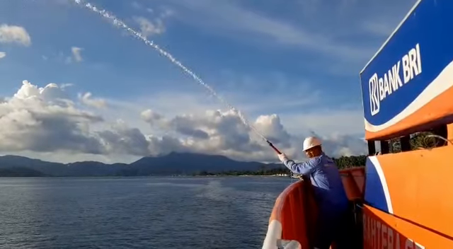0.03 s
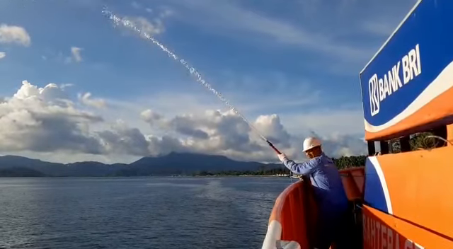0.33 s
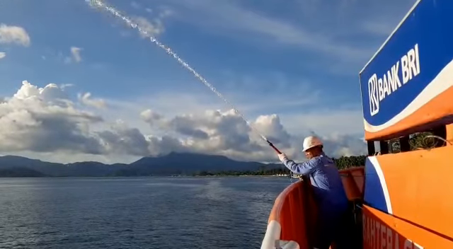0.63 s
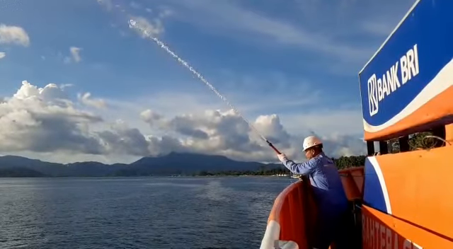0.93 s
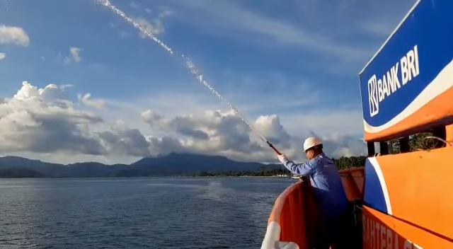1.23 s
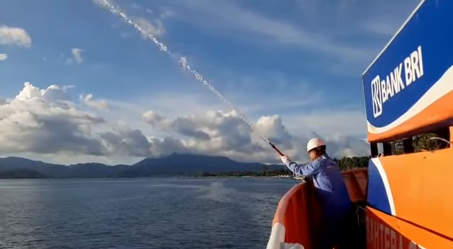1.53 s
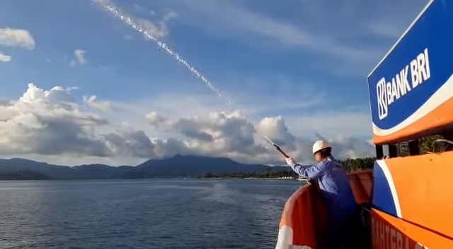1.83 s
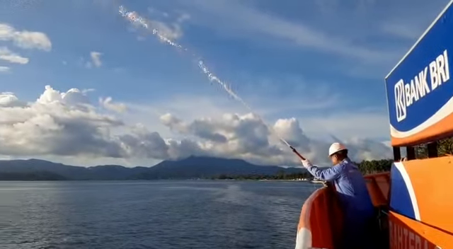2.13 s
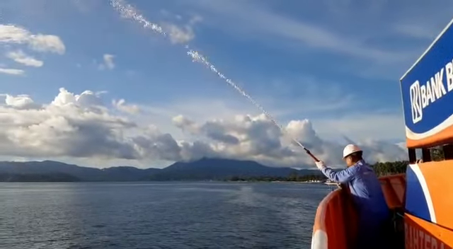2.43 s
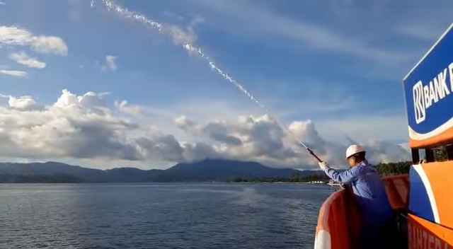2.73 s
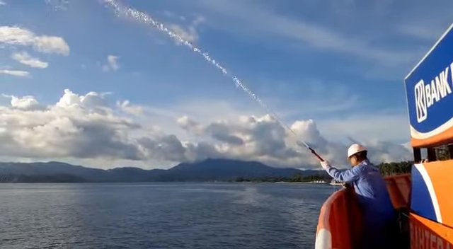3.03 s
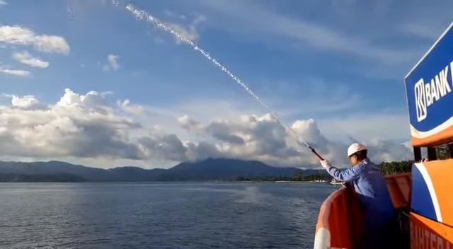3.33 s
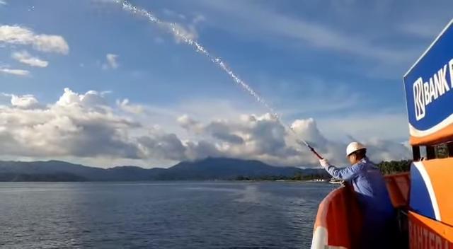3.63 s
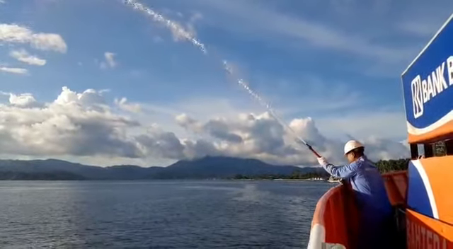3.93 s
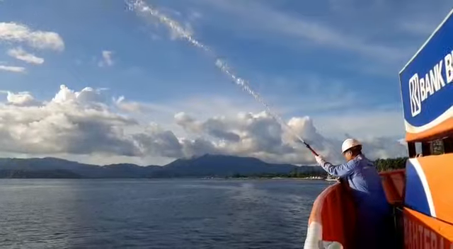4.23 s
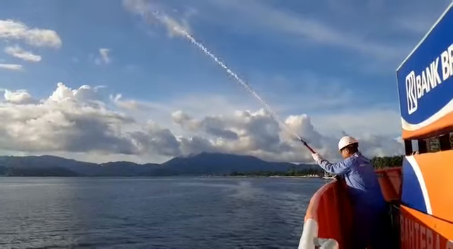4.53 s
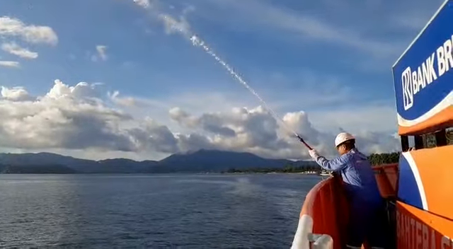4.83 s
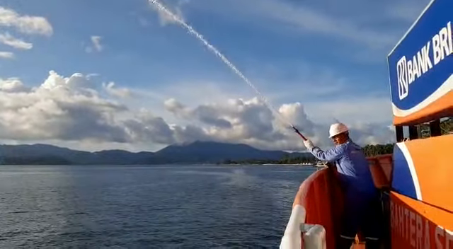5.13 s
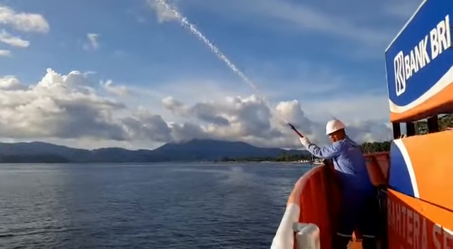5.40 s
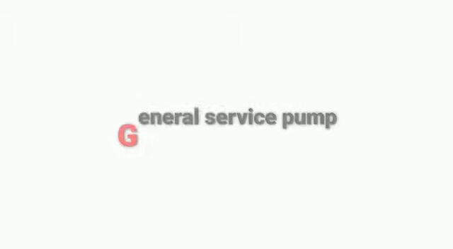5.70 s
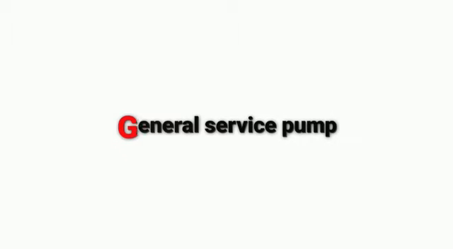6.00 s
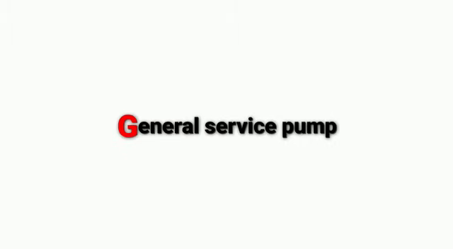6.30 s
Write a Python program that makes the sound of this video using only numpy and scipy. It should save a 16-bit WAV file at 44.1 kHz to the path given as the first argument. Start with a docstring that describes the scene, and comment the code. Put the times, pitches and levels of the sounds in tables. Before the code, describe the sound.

From the start, a ship's diesel engine throbs loudly and evenly, with a low machinery rumble and a faint pump whine. Over it, a fire hose gives a thin, steady hiss. The nozzle cracks and spits sharply at uneven intervals, about three times a second, each crack followed by a very short echo from nearby steel walls. The cracks bunch together between about 4.1 and 4.7 seconds, pause, then return at 5.4 and 5.6 seconds. Faint drops tick on the rail throughout. A breeze buffets the microphone with low gusts, strongest near 0.5, 2.5, 3.1 and 4.3 seconds. Dull hull thumps come softly at 0.5 seconds, then near 2.4 and 3.1, and more strongly at 3.6 and 5.7 seconds. Everything cuts off abruptly at about 5.8 seconds, leaving silence.

```python
"""Fire hose on a ship's deck

A diesel throbs and drives the fire pump while a hose throws a thin, hissing jet over a calm sea.
The nozzle spits and cracks sharply, probably as trapped air bursts out; close steel walls reflect
each crack, and stray drops tick on the rail. A breeze buffets the microphone, and something thumps
dully on the hull now and then. The sound stops abruptly."""
import sys
import numpy as np
from scipy import signal
from scipy.fft import rfft, irfft, next_fast_len
from scipy.io import wavfile
from scipy.ndimage import uniform_filter1d, map_coordinates

SR = 44100
rng = np.random.default_rng(int(sys.argv[2]) if len(sys.argv) > 2 else 0)


def pcm_store(signal):
    """Save signal as 16-bit PCM."""
    levels = np.round(np.clip(np.atleast_2d(signal), -1, 1) * 32767)
    wavfile.write(sys.argv[1], SR, levels.astype(np.int16).T)


N = 280476

# likeness of left and right in the noise on deck: (frequency [Hz], correlation [-1..1])
DECK_CORRELATION = [(60, 1), (130, 0.98), (290, 0.75), (640, 0.27), (1410, -0.46), (3100, -0.17),
                    (6820, -0.0052), (15000, -0.086)]


def amp(db):
    """Amplitude ratio of a level in decibels."""
    return 10 ** (np.asarray(db) / 20)


def unit(x):
    """Normalisation to an rms of 1."""
    return x / np.sqrt(np.mean(x ** 2) + 1e-20)


def along(points, hz):
    """Interpolation of (frequency [Hz], value) points on a logarithmic frequency axis."""
    freqs, values = np.transpose(points)
    return np.interp(np.log(hz + 1), np.log(freqs + 1), values)


def curve(points):
    """Linear interpolation of (time [s], value) points at every sample."""
    return np.interp(np.arange(N) / SR, *np.transpose(points))


def wobble(rate):
    """Slow random modulation: a spline through `rate` Gaussian knots a second."""
    knots = rng.standard_normal(int(N * rate / SR) + 4)
    return map_coordinates(knots, [np.arange(N) * rate / SR])


def pan(db):
    """Channel gains for an interaural level difference, left minus right."""
    return amp(np.array([[.5], [-.5]]) * db)


def filtered(x, response):
    """Linear filtering: the spectrum is multiplied by response(hz)."""
    size = next_fast_len(N + SR // 2)
    return irfft(rfft(x, size) * response(np.fft.rfftfreq(size, 1 / SR)), size)[..., :N]


def minimum_phase(gain):
    """Folding the cepstrum gives the quickest causal response with this gain."""
    cepstrum = irfft(np.log(np.maximum(gain, 1e-6)))
    half = cepstrum.shape[-1] // 2
    return np.exp(rfft(cepstrum * np.r_[1, np.full(half - 1, 2), 1, np.zeros(half - 1)]))


def add(track, s, sound):
    """Superposition of a sound on the track from s seconds on."""
    start = round(s * SR)
    track[:, start:start + sound.shape[-1]] += sound[:, :N - start]


def rush(spectrum, correlation, patchy_db):
    """Partly coherent stereo noise of rms 1, its gain patchy in time and frequency."""
    cells = signal.stft(rng.standard_normal((2, N)), nperseg=512)[2]
    patches = uniform_filter1d(rng.standard_normal(cells.shape[1:]), size=5, axis=0)
    patches = uniform_filter1d(patches, size=14, axis=1)
    pair = signal.istft(cells * amp(patchy_db * unit(patches)), nperseg=512)[1][:, :N]

    def mid_side_gains(hz):
        angle = np.arccos(np.clip(along(correlation, hz), -1, 1)) / 2
        return amp(along(spectrum, hz)) * [np.cos(angle), np.sin(angle)]

    mid, side = filtered(pair, mid_side_gains)
    return unit(np.array([mid + side, mid - side]))


def scatter(t, t60, smooth_hz=500):
    """Diffuse reflection: exponentially decaying stereo noise, whitened to unit energy."""
    envelope = amp(-60 * t / t60) * (1 - np.exp(-t / 0.00066))
    spectrum = rfft(rng.standard_normal((2, len(t))) * envelope)
    power = uniform_filter1d(np.abs(spectrum) ** 2, size=int(smooth_hz * len(t) / SR), axis=1)
    return irfft(spectrum / np.sqrt(np.abs(power) + 1e-20))


def engine_room(level_db=-34):
    """Structure-borne sound: a steady machinery rumble comes up through the deck."""
    # rumble spectrum: (frequency [Hz], relative density [dB])
    spectrum = [(20, -23.5), (40, -10), (70, 2), (97, -6), (130, 1.5), (230, -3), (330, -5), (450, -14),
                (600, -22), (1200, -38)]
    return amp(level_db) * rush(spectrum, DECK_CORRELATION, patchy_db=0.5) * pan(-1.8)


def wind(eddy_db=1.62, eddies_per_s=9, flap_steepness=2.32):
    """Turbulent pressure: eddies hit each microphone port separately; strong gusts add brighter flaps."""
    # strength of the breeze: (time [s], relative level [dB])
    breeze = [(0, -31.5), (.17, -31.5), (.35, -39), (.52, -25), (.78, -33), (.92, -29.5), (1.48, -30),
              (1.95, -36.5), (2.1, -32), (2.48, -23.5), (2.75, -30), (3.12, -24.5), (3.6, -40.5),
              (3.9, -31.5), (4.28, -26.5), (4.6, -40.5), (5.7, -41.5)]
    # buffeting spectrum: (frequency [Hz], relative density [dB])
    buffet_spectrum = [(20, -27), (30, -25.5), (50, 3.5), (95, 3.5), (140, 4), (200, -1), (300, -13.5),
                       (450, -30.5), (700, -32), (1500, -55.5)]
    flap_spectrum = [(120, -19), (280, 9.5), (450, 4.5), (700, -10), (1500, -41)]
    breeze_db = curve(breeze)
    buffet_db = breeze_db + 2.5 + eddy_db * wobble(eddies_per_s) + 1.1 * wobble(27)
    buffet = rush(buffet_spectrum, correlation=[(50, 0.2)], patchy_db=0.5)
    flap = rush(flap_spectrum, correlation=[(300, 0.43)], patchy_db=-1)
    strongest_db = breeze_db.max()
    flap_db = strongest_db - 9 + flap_steepness * (breeze_db - strongest_db) + 2.5 * wobble(55)
    return amp(buffet_db) * buffet + amp(flap_db) * flap


def pump(drift_rad=0.46, flutter_db=1.5):
    """Rotating impeller and gears radiate thin tones, slightly modulated in amplitude and phase."""
    # pump and gear tones: (frequency [Hz], relative level [dB])
    whine = [(96.3, -35), (400.6, -46.5), (630.4, -55.5), (801.5, -54), (972.8, -57.5), (1086.8, -59),
             (1201.2, -55.5), (1346.5, -65), (1520, -60)]
    t = np.arange(N) / SR
    tone = lambda hz: np.sqrt(2) * np.sin(2 * np.pi * hz * t + drift_rad * wobble(7))
    return sum(amp(db - 2 + flutter_db * wobble(12)) * tone(hz) for hz, db in whine) * pan(-1.6)


def diesel(level_db=-18, sway_db=0.06, first_beat_s=.0218, suction_rad=0.81):
    """Periodic exhaust pulses form a harmonic series: three firings a turn, one of them stronger."""
    # shaft speed under an even load: (time [s], rate [turns/s])
    shaft_speed = [(0, 20.044), (.7, 20.099), (1.3, 20.039), (3.3, 20.044), (3.9, 20.023), (4.6, 20.06),
                   (5.75, 20.004)]
    # exhaust harmonics: (multiple of the shaft rate, relative level [dB])
    harmonics = [(2, -46), (3, -9), (4, -16), (5, -38.5), (6, -0.5), (7, -9.5), (8, -10.5), (9, 2),
                 (10, -20.5), (11, -38), (12, -24), (13, -48.5), (14, -42), (15, -16), (16, -29.5),
                 (17, -26.5), (18, -39.5), (19, -46), (21, -47), (23, -39.5)]
    speed = curve(shaft_speed)
    turns = np.cumsum(speed) / SR - first_beat_s * speed[0]
    # the common phase shift makes each firing a push followed by suction
    throb = sum(amp(db) * np.cos(2 * np.pi * k * turns + suction_rad) for k, db in harmonics)
    return amp(level_db + sway_db * wobble(5.2)) * unit(throb) * pan(-1.93)


def hull_thumps(attack_s=0.0022):
    """Modal vibration: soft blows excite a few low, well damped modes of the hull plating."""
    # blows: (time [s], relative level [dB], pitch [Hz], 60 dB decay time [s])
    blows = [(0.497, -17, 229, .11), (2.413, -10, 335, 0.03), (3.073, -7.5, 345, 0.041),
             (3.156, -18, 335, .05), (3.593, -3, 352, 0.064), (5.679, -3, 272.4, .15),
             (5.711, -12.5, 284, 0.25)]
    # plate modes: (frequency ratio, relative level [dB], decay time ratio)
    modes = [(0.999, -0.5, 1), (1.1, -7.5, 0.94), (1.4, -12, .8), (1.85, -11, 0.31), (2.7, -14.5, 0.35)]
    out, t = np.zeros((2, N)), np.arange(SR // 2) / SR
    for s, db, hz, t60 in blows:
        ring = sum(amp(mode_db - 60 * t / (t60 * life)) * np.sin(2 * np.pi * hz * ratio * t)
                   for ratio, mode_db, life in modes)
        add(out, s, amp(db - 7.5) * ring * (1 - np.exp(-t / attack_s)) * pan(-1.5))
    return out


def spatter(count=110, faintest_db=-46, spread_db=3, centre_hz=4200, decay_cycles=2.7):
    """Impact sound: each stray drop on the rail excites a faint, damped oscillation."""
    out, t = np.zeros((2, N)), np.arange(SR // 100) / SR
    for when, softness, pitch, side in rng.random((count, 4)):
        hz = centre_hz * 2 ** (2 * pitch - 1)
        tick = np.sin(2 * np.pi * hz * t) * np.exp(-hz * t / decay_cycles)
        db = faintest_db - spread_db * np.log(softness + 0.011)
        add(out, when * (N / SR - t[-1]), amp(db) * tick * pan(12 * (side - .5)))
    return out


def jet(level_db=-38.5, sway_db=0.4, flicker_db=0.79):
    """Jet break-up: a stream at constant pressure tears into drops and radiates a broadband hiss."""
    # hiss spectrum: (frequency [Hz], relative density [dB])
    spectrum = [(300, -14), (550, -5), (700, 0), (1100, -2), (1600, -2), (2300, -5.5), (3000, -7.5),
                (4600, -7.5), (5700, -11.5), (7200, -9), (9500, -22), (11300, -11.5), (13000, -12.5),
                (15500, -10)]
    # stereo balance of the hiss: (frequency [Hz], left minus right [dB])
    balance = [(60, -1), (110, -2), (200, -7.5), (380, -6), (700, -2), (1290, -1), (2380, 0.5), (4400, -4),
               (8120, 3), (15000, 4.5)]
    hiss = rush(spectrum, DECK_CORRELATION, patchy_db=2)
    hiss = filtered(hiss, lambda hz: pan(along(balance, hz)))
    return amp(level_db + sway_db * wobble(2.7) + flicker_db * wobble(45)) * hiss


def spits(attack_s=0.0017, t60=0.046):
    """Unsteady flow: the stream stutters and throws short puffs of bright spray."""
    # puffs between the bursts: (time [s], relative level [dB])
    puffs = [(0.198, -38), (1.109, -34), (1.55, -40), (1.913, -38), (2.18, -37), (3.98, -36)]
    # spray spectrum: (frequency [Hz], relative density [dB])
    spectrum = [(1000, -18.5), (3000, 3), (4800, 0), (7000, -3.5), (10000, -16.5), (15000, -14.5)]
    envelope, t = np.zeros((1, N)), np.arange(SR // 4) / SR
    for s, db in puffs:
        puff = amp(db - 60 * t / t60) * (1 - np.exp(-t / attack_s))
        add(envelope, s, puff[None])
    return amp(5.5) * envelope * rush(spectrum, DECK_CORRELATION, patchy_db=1.5)


def air_bursts(soft_db=-37.5, thinning=0.28, ring_width_hz=570, ring_echo_db=-8.5):
    """Impulse excitation: escaping air cracks, rings the nozzle and flings spray; steel walls echo it."""
    # air pockets: (time [s], relative level [dB], clack boost [dB], spray boost [dB],
    # nozzle resonance [Hz], resonance gain [dB])
    bursts = [(0.082, -31.5, -1, -7, 3600, -0.5), (0.299, -29.5, -7, -7, 3660, 4.5),
              (0.727, -30, -2.5, -6, 3700, -4), (1.192, -27.5, -3.5, 3.5, 3900, -1),
              (1.483, -28.5, -3.5, -1, 4100, -5.5), (1.852, -34, 6, 4, 3530, -5.5),
              (2.051, -29, -0.5, -1.5, 4885, -0.5), (2.281, -29.5, 6.5, -5, 3400, -5),
              (2.567, -33.5, 4, 1, 4700, -2), (2.998, -42, 6, 3, 3230, 1), (3.433, -36, -2.5, -7, 3610, -7),
              (3.56, -30, -2.5, -2.5, 3820, 1.5), (3.867, -34.5, 6, 2, 3730, 2),
              (4.156, -29.5, -0.5, 2.5, 3740, 1.5), (4.318, -31.5, 1, -5.5, 3560, -0.5),
              (4.355, -36, -5, 2, 3760, 3), (4.552, -28, 2, -4, 3700, 2.5), (4.657, -34.5, 2, 3.5, 3680, 0),
              (5.397, -39.5, 5, 0, 4630, -9), (5.583, -27.5, 6, 2, 4930, -6)]
    # crack spectrum: (frequency [Hz], relative level [dB])
    spectrum = [(150, -9), (350, -0.5), (550, 3), (780, -4), (1120, -1.5), (1400, -0.5), (1750, -3),
                (2100, -5), (2500, -7), (3100, -13.5), (4900, -13.5), (6000, -17.5), (9500, -23.5),
                (14000, -20.5)]
    # stereo balance of crack and echo: (frequency [Hz], left minus right [dB])
    balance = [(500, 0.5), (1000, -1.5), (2100, 4), (2800, -4.5), (3700, -4.5), (5000, -4.5), (7000, -2.5),
               (13000, 4.5)]
    size = 16384
    out, t, hz = np.zeros((2, N)), np.arange(size) / SR, np.fft.rfftfreq(size, 1 / SR)
    lead_s, treble_lag_s = .005, .004  # the treble trails the bass, by the full lag at SR / 2
    dispersion = np.exp(-2j * np.pi * hz * (lead_s + treble_lag_s * hz / SR))
    sides = pan(along(balance, hz))
    for s, db, clack_db, spray_db, ring_hz, ring_db in bursts:
        # louder bursts sound thinner: their bass grows less than their body
        bass_db = thinning * (soft_db - db)
        tint = [(700, bass_db), (1050, 0.006), (1800, 0.0052), (2100, clack_db),
                (3000, clack_db), (4200, 0.00093), (8000, spray_db)]
        body = amp(along(spectrum, hz) + along(tint, hz))
        ring = amp(ring_db) / (1 + (2 * (hz - ring_hz) / ring_width_hz) ** 4)
        crack = ((t == 0) + amp(-1.5) * scatter(t, t60=0.0096)) * pan(-3)
        echo = amp(5) * scatter(t, t60=0.093) + scatter(t, t60=0.22)  # near steel, then a fainter tail
        direct = minimum_phase(np.hypot(body, ring) * sides) * rfft(crack)
        reflected = minimum_phase(np.hypot(body, amp(ring_echo_db) * ring) * sides) * rfft(echo)
        add(out, s + .0007 - lead_s, amp(db + 39) * irfft(dispersion * (direct + reflected)))
    return out


def scene():
    """Superposition: the pressures of machinery, breeze, hose and hull add."""
    background = diesel() + pump() + engine_room() + wind()
    return background + jet() + air_bursts() + spits() + hull_thumps() + spatter()


def record(dry, stop_s=5.797, fade_s=.002, top_hz=15600):
    """Gating and band limiting: the sound stops sharply, and a steep low-pass removes the top treble."""
    gate = np.clip((stop_s - np.arange(N) / SR) / fade_s, 0, 1)
    return filtered(dry * gate, lambda hz: 1 / np.sqrt(1 + (hz / top_hz) ** 300))


dry = scene()
out = record(dry)
pcm_store(out)
```